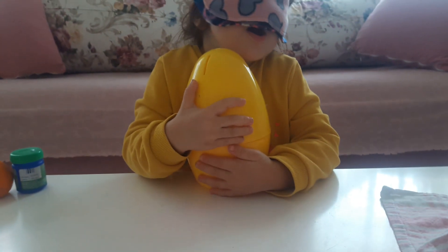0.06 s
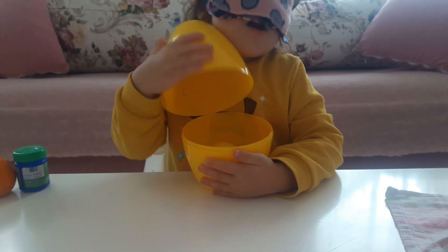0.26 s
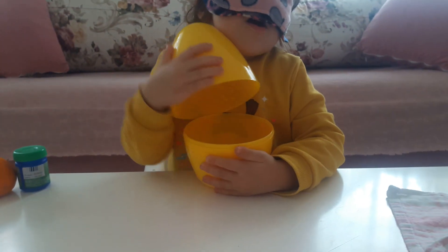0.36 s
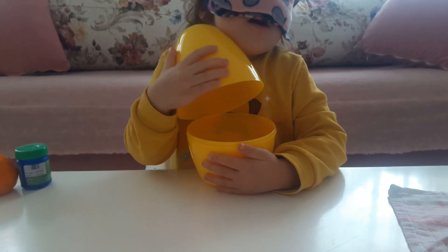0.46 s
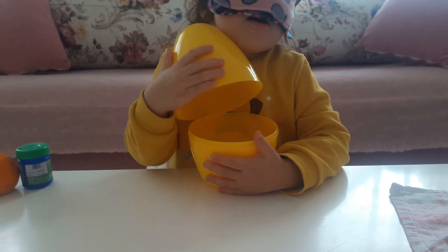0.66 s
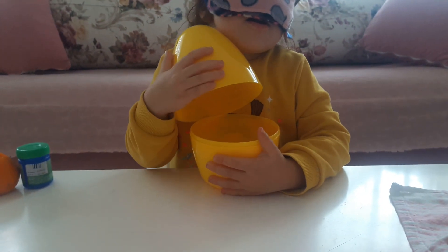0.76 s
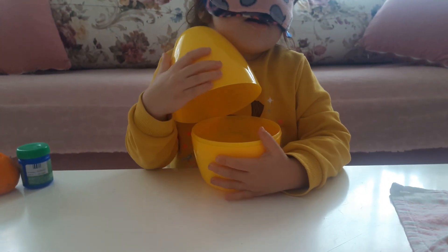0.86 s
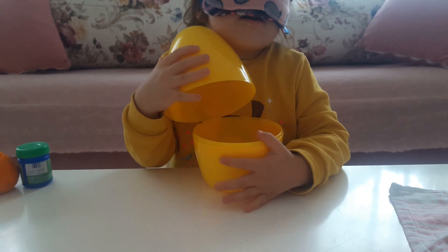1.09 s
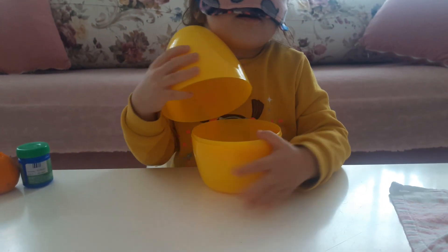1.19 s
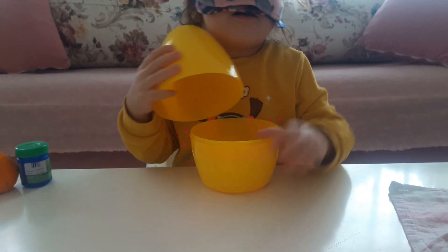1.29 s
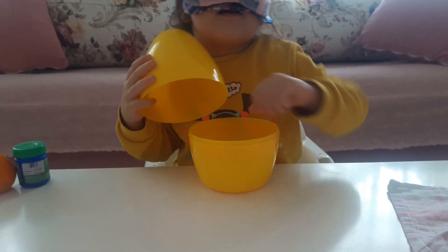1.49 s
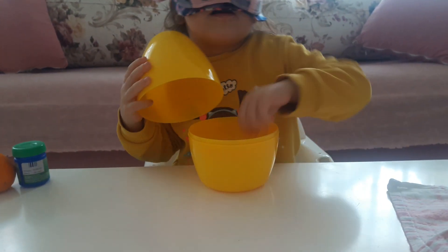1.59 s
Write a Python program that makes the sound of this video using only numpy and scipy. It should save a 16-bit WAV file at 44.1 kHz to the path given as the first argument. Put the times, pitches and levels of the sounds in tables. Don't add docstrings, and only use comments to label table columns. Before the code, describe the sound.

A big hollow plastic egg pops open with a loud double crack and dull table boom, then lighter clicks, faint fingertip taps and a soft hollow set-down, heard close in a quiet furnished room.

```python
import sys
import numpy as np
from scipy import signal
from scipy.fft import rfft, irfft, next_fast_len
from scipy.io import wavfile
from scipy.ndimage import uniform_filter1d, map_coordinates

SR = 44100
rng = np.random.default_rng(int(sys.argv[2]) if len(sys.argv) > 2 else 0)


def nominal_scale(level):
    x = np.asarray(level, float) / 20
    return 10 ** x


def store_pcm(level_fs):
    pcm = np.round(np.clip(level_fs, -1, 1) * 32767).astype(np.int16)
    wavfile.write(sys.argv[1], SR, np.atleast_2d(pcm).T)


N = 72765


def unit(x):
    return x / np.sqrt(np.mean(x ** 2) + 1e-20)


def along(points, hz):
    f, v = np.transpose(points)
    return np.interp(np.log(hz + 1), np.log(f + 1), v)


def filtered(x, response):
    m = next_fast_len(x.shape[-1] + 8192)
    spectrum = rfft(x, m) * response(np.fft.rfftfreq(m, 1 / SR))
    return irfft(spectrum, m)[..., :x.shape[-1]]


def paired(pair, alike, spectrum=((20, 0), (20000, 0))):
    def mid_and_side(hz):
        turn = np.arccos(np.clip(along(alike, hz), -1, 1)) / 2
        return nominal_scale(along(spectrum, hz)) * [np.cos(turn), np.sin(turn)]

    mid, side = filtered(pair, mid_and_side)
    return np.array([mid + side, mid - side])


def add(track, s, sound):
    part = track[round(s * SR):][:len(sound)]
    part += sound[:len(part)]


def ring(t, hz, db, t60, rise_s):
    decay = nominal_scale(db + 1.0 - 60 * t / max(t60, .002))
    return decay * np.sin(2 * np.pi * hz * t) * (1 - np.exp(-t / rise_s)) ** 2


def flutter(t, db, rate):
    return nominal_scale(db * np.interp(t * rate, np.arange(200), rng.standard_normal(200)))


def struck(rows, body, scatter_db, flutter_db):
    rise_cycles, top_hz = 0.16, 1280
    out, t = np.zeros(N), np.arange(SR // 2) / SR
    for s, db, hz, t60, body_db in rows:
        luck = rng.normal(0, scatter_db, len(body))
        tail = np.zeros(len(t))
        for (f, mode_db, mode_t60), g in zip(body, luck):
            tail += ring(t, f, mode_db + g, mode_t60, rise_cycles / f) * flutter(t, flutter_db, 70)
        shell = ring(t, hz, 0, t60, rise_cycles / hz)
        add(out, s, nominal_scale(db + 2) * shell + nominal_scale(db + body_db - 11.0) * tail)
    return filtered(out, lambda f: 1 / (1 + 1.2j * f / top_hz - (f / top_hz) ** 2))


def rubbing(rows, breadth, grain_db):
    out = np.zeros(N)
    for s, length, db, hz in rows:
        u = np.linspace(-2, 2, int(2 * length * SR))
        hiss, grain = rng.standard_normal((2, len(u)))
        grit = hiss * nominal_scale(grain_db * unit(uniform_filter1d(grain, size=40)))

        def resonance(f):
            damping = 1j * f * breadth * hz
            return (damping / (hz * hz - f * f + damping)) ** 2

        add(out, s - length, nominal_scale(db) * unit(filtered(grit, resonance)) * np.exp(-2 * u ** 2))
    return out


def air():
    # (frequency [Hz], left-right likeness)
    air_color = [(40, -6), (110, -1), (400, -11.5), (1400, -18), (3500, -23.5), (5000, -33.5),
                 (9000, -35.5), (13000, -27.5)]
    air_alike = [(60, 0.74), (500, 0), (2000, 0), (8000, 0)]
    # (frequency [Hz], left-right likeness)
    wall_alike = [(100, 1), (500, 0.7), (1500, 0.92), (5000, 0.031)]
    # (time [s], level [dB])
    sleeve_color = [(100, 0), (300, -7.5), (900, -12), (1500, -10.5), (3500, -16), (5000, -24), (8000, -27),
                    (12000, -51)]
    sleeve_level = [(0, -106), (.2, -80), (0.601, -72), (1.201, -65), (1.65, -63.5)]
    s, db = np.transpose(sleeve_level)
    sway = map_coordinates(rng.standard_normal(40), [np.arange(N) * 20 / SR])
    sleeves = unit(paired(rng.standard_normal((2, N)), wall_alike, sleeve_color))
    sleeves = sleeves * nominal_scale(np.interp(np.arange(N) / SR, s, db) + 1.2 * sway)
    tone = unit(paired(rng.standard_normal((2, N)), air_alike, air_color))
    return nominal_scale(-64) * tone + sleeves


def shell_knocks():
    # (time [s], peak level [dB], pitch [Hz], t60 [s], table ring [dB])
    knock_list = [(.2105, -17, 744, 0.0095, -12), (.2115, -16.5, 240, 0.061, -17),
                  (.2145, -10.5, 233.4, 0.029, -12), (.230, -18, 238, 0.04, -11),
                  (.2405, -9.5, 432, 0.018, -7.5), (.2426, -4.5, 644, 0.011, -18.5),
                  (.2495, -16.5, 382.5, 0.011, -19), (.2865, -20.5, 689, 0.027, -31),
                  (.375, -58, 507, 0.015, -6), (.393, -29.5, 590, 0.017, -7), (.519, -30, 560, 0.016, -18),
                  (.5225, -21.5, 238, 0.01, -48), (.536, -43.5, 128, 0.09, -15),
                  (.5628, -31.5, 516.5, 0.049, -18), (.5734, -34, 506, 0.048, -13),
                  (.597, -46, 597, 0.017, -27), (.600, -30, 200, 0.027, -18), (.628, -49.5, 997, 0.07, -6),
                  (.6595, -33, 232, 0.017, -26), (1.592, -47.5, 208.5, 0.088, -1)]
    # (pitch [Hz], level [dB], t60 [s])
    table_modes = [(200, -2.5, .13), (250, -7.5, 0.081), (413, 0.5, 0.14), (560, 1, 0.033),
                   (671.4, -5.5, 0.1), (789, 0, .1)]
    return struck(knock_list, table_modes, scatter_db=3.5, flutter_db=4)


def hand_shifts():
    # (middle [s], length [s], rms level [dB], pitch [Hz])
    shift_list = [(.265, 0.054, -45, 330), (.31, .07, -36.5, 580), (.33, .1, -41.5, 158),
                  (.47, .08, -60.5, 70), (.60, .05, -58, 69.6), (.66, .1, -51.5, 95), (.70, 0.11, -64, 187),
                  (.85, 0.11, -62.5, 339), (.95, 0.072, -67, 440), (1.02, .08, -66, 400),
                  (1.275, .04, -57, 750), (1.335, .05, -53, 694), (1.365, 0.058, -56, 200),
                  (1.43, .05, -59.5, 190), (1.415, .04, -66, 700), (1.63, .06, -63.5, 150)]
    return rubbing(shift_list, breadth=1.3, grain_db=4)


def rim_clicks():
    # (time [s], peak level [dB], main pitch [Hz], t60 [s], brightness [dB])
    click_list = [(0.2112, -23.5, 1595, 0.045, 2.5), (0.2143, -8, 1863, 0.0075, 0),
                  (0.29, -8, 3190, 0.0077, -7.5), (0.3735, -39.5, 3030, 0.013, -7),
                  (0.3935, -15, 3326, 0.0093, -3), (0.5183, -37.5, 3420, 0.01, 8),
                  (0.5224, -42, 2000, 0.007, -3.5), (0.5631, -42, 2037, 0.016, -5),
                  (0.5746, -48, 2080, 0.011, -3), (0.5968, -32, 2690, 0.011, -5),
                  (0.6279, -33, 2890, 0.0073, -5), (0.6357, -41, 2920, 0.0052, -8),
                  (0.6542, -46, 2920, 0.015, 1), (1.0841, -47.5, 3850, 0.011, -2),
                  (1.101, -46.5, 4100, 0.0097, 0.5), (1.2471, -37.5, 3066, 0.021, -1),
                  (1.3, -50, 3350, 0.021, 3.5), (1.3105, -42, 2980, 0.025, -3),
                  (1.3211, -55, 3150, 0.029, 2), (1.5292, -46, 2420, 0.011, 0)]
    # (time [s], level [dB], pitch [Hz], t60 [s])
    ring_list = [(.2146, -20, 4250, .01), (.2142, -27, 6600, .01), (.2200, -30, 4800, .012),
                 (.2225, -29, 6400, .01), (.3934, -30, 870, .02), (1.2455, -46, 2150, .012),
                 (1.3105, -52, 1800, .012), (.2205, -27, 2050, .015), (.2903, -17, 5010, .013),
                 (.2905, -33, 1850, .012), (.3931, -24, 4150, .008), (.3942, -26, 2470, .012),
                 (.3934, -34, 7700, .01), (.3965, -32, 4200, .01), (.3945, -19, 3050, .006),
                 (.5188, -40, 4400, .008), (.5972, -41, 3400, .008), (.5972, -43, 2250, .01),
                 (.5975, -45, 4600, .008), (.6282, -43, 1800, .012), (.6282, -42, 3550, .01),
                 (.6582, -51, 3210, .012), (1.5295, -56, 3500, .015), (1.5295, -56, 2870, .015)]
    # (frequency [Hz], left-right likeness)
    splinter_color = [(700, 0.5), (1700, -13.5), (3200, -1), (5000, -8), (7000, -12.5), (9500, -30),
                      (12500, -20.5), (16000, -34)]
    splinter_alike = [(1000, 0.81), (3000, 1), (9000, 0.43)]
    # (frequency [Hz], level [dB])
    wall_color = [(600, -15), (1200, -3.5), (2200, 4.5), (3500, -1.5), (5200, -6.5), (7500, -16.5),
                  (9500, -27), (14000, -25.5)]
    crack_db, crack_longer, rise_s = -4.5, 2.11, 0.00019
    rings, cracks, blows = np.zeros(N), np.zeros((2, N)), np.zeros(N)
    t = np.arange(SR // 20) / SR
    for s, db, hz, t60, bright_db in click_list:
        noise = unit(paired(rng.standard_normal((2, len(t))), splinter_alike, splinter_color))
        shape = nominal_scale(db + bright_db + crack_db - 60 * t / (crack_longer * t60)) * (1 - np.exp(-t / rise_s))
        add(rings, s, ring(t, hz, db, t60, rise_s))
        add(cracks.T, s, (shape * noise).T)
        blows[round(s * SR) + 40] = np.linalg.norm(shape) / 10
    for s, db, hz, t60 in ring_list:
        add(rings, s, ring(t, hz, db, t60, rise_s))
    return rings + cracks, filtered(blows, lambda hz: nominal_scale(along(wall_color, hz)))


def skin_strokes():
    # (middle [s], length [s], rms level [dB], pitch [Hz])
    stroke_list = [(.2215, 0.0097, -30.5, 5560), (.325, 0.053, -48.5, 3200), (.452, 0.076, -57.5, 3350),
                   (.845, 0.23, -70.5, 3480), (.954, 0.017, -57, 3300), (1.019, 0.036, -54.5, 3230),
                   (1.095, 0.028, -63, 3800), (1.234, 0.037, -55, 3700), (1.267, 0.016, -56, 4120),
                   (1.325, 0.08, -64.5, 3400), (1.417, 0.044, -58, 3520)]
    return rubbing(stroke_list, breadth=.6, grain_db=3)


def room(x):
    # (frequency [Hz], t60 [s])
    room_decay = [(100, 0.39), (500, 0.46), (2000, 0.3), (5000, 0.32), (9000, .3), (15000, 0.26)]
    # (frequency [Hz], left-right likeness)
    room_alike = [(100, 1), (500, 0.7), (1500, 0.92), (5000, 0.031)]
    out, hop = np.zeros((2, N + SR)), SR // 10
    for k in range(0, N, hop):
        hz, t, z = signal.stft(rng.standard_normal((2, SR // 2)), SR, nperseg=256)
        z = z * nominal_scale(-60 * t / along(room_decay, hz)[:, None])
        tail = signal.istft(z, SR, nperseg=256)[1][:, :SR // 2]
        wet = signal.fftconvolve(x[None, k:k + hop], tail / np.linalg.norm(tail[0]), axes=1)
        out[:, k + 130:][:, :wet.shape[1]] += wet
    return paired(out[:, :N], room_alike)


def table_boom():
    # (pitch [Hz], level [dB], t60 [s])
    boom_modes = [(86.2, -33.5, 0.5), (106.7, -32.5, 0.64)]
    out, t = np.zeros(N), np.arange(SR) / SR
    beating = sum(ring(t, hz, db, t60, 0.0054) * flutter(t, 3, 18) for hz, db, t60 in boom_modes)
    add(out, .2245, beating)
    return out


def fingertip_taps():
    # (time [s], peak level [dB], pitch [Hz], t60 [s])
    tap_list = [(.816, -61.5, 205, .03), (.839, -64, 355, 0.028), (.9125, -55, 520, .015),
                (.919, -53, 330, 0.021), (.937, -48.5, 260, .02), (.949, -54.5, 624, 0.022),
                (.968, -55.5, 230, .03), (.984, -51.5, 430, 0.03), (.996, -58, 420, 0.021),
                (1.007, -57, 700, 0.011), (1.015, -52.5, 270, 0.028), (1.019, -58.5, 790, 0.018),
                (1.031, -51.5, 700, 0.013), (1.043, -60, 560, 0.018), (1.071, -53.5, 206, 0.025),
                (1.084, -47, 650, 0.0092), (1.088, -53.5, 250, 0.037), (1.0935, -47, 680, 0.01),
                (1.097, -52, 280, 0.027), (1.1015, -46, 520, 0.012), (1.120, -54, 239, 0.03),
                (1.1315, -44, 700, 0.0093), (1.164, -52.5, 255, 0.023)]
    out, t = np.zeros(N), np.arange(SR // 10) / SR
    for s, db, hz, t60 in tap_list:
        add(out, s, ring(t, hz, db + 6.5, t60, 0.28 / hz))
    return out


def bowl_settling():
    # (time [s], peak level [dB], pitch [Hz], t60 [s], bowl ring [dB])
    settle_list = [(1.241, -36.5, 620, 0.0089, -4.5), (1.246, -29.5, 456, 0.035, -12.5),
                   (1.249, -27.5, 679, 0.017, -3), (1.259, -28, 390, 0.014, -27),
                   (1.3112, -25.5, 500, 0.0076, -8), (1.314, -29, 209.7, 0.041, -3),
                   (1.322, -31.5, 400, 0.014, 2.5)]
    # (pitch [Hz], level [dB], t60 [s])
    bowl_modes = [(119.3, -16, 0.44), (211, -4, 0.24), (351.3, -2, 0.32), (419.4, -1, 0.16)]
    return struck(settle_list, bowl_modes, scatter_db=1, flutter_db=2.5)


def rim_squeaks():
    # (middle [s], length [s], rms level [dB], pitch [Hz])
    squeak_list = [(1.419, .024, -60, 2640), (1.414, .025, -61, 3910), (1.422, .022, -59, 4500),
                   (1.40, .03, -65, 4550), (1.42, .05, -67, 4930)]
    return rubbing(squeak_list, breadth=.07, grain_db=3)


def scene():
    # (frequency [Hz], level [dB])
    port_lean = [(60, -4), (200, -2), (1200, -3), (2500, -4), (5000, -8.5), (9000, -4), (15000, 0)]
    # (frequency [Hz], phase [rad])
    port_lead = [(1000, 0.26), (3200, 1), (4650, 1.32), (8200, 2.5), (15000, 0.7)]
    sides = np.array([[.5], [-.5]])

    def lean(hz):
        return nominal_scale(sides * along(port_lean, hz))

    def lean_and_lead(hz):
        return lean(hz) * np.exp(1j * sides * along(port_lead, hz))

    sharp, blows = rim_clicks()
    dull = shell_knocks() + hand_shifts() + skin_strokes() + rim_squeaks()
    bowl, light = bowl_settling(), fingertip_taps()
    near = filtered(sharp + dull + bowl + light + table_boom(), lean_and_lead)
    wet = room(nominal_scale(-8) * (dull + 0.5 * bowl + 0.29 * light) + nominal_scale(20.5) * blows)
    return near + filtered(wet + air(), lean)


def low_pass(x):
    return signal.sosfilt(signal.butter(12, 16440, fs=SR, output="sos"), x)


def record(dry):
    low_cut_hz, top_hz, offset = 75, 16300, -.0005
    cut = filtered(dry, lambda hz: (1j * hz / (low_cut_hz + 1j * hz)) ** 2 * (hz < top_hz))
    return low_pass(cut + offset)


dry = scene()
out = record(dry)
store_pcm(out)
```